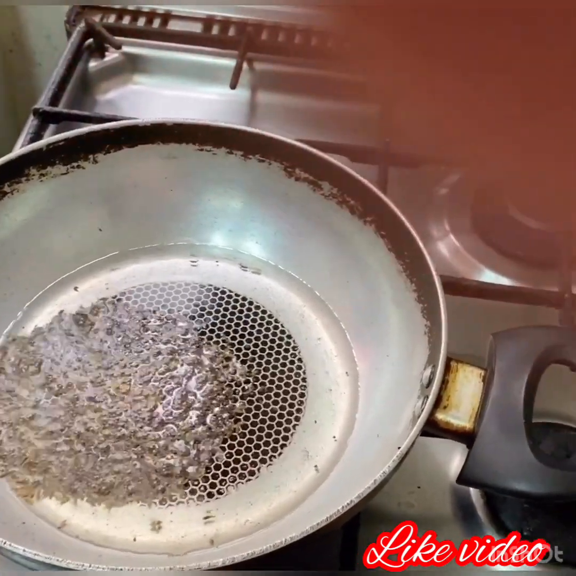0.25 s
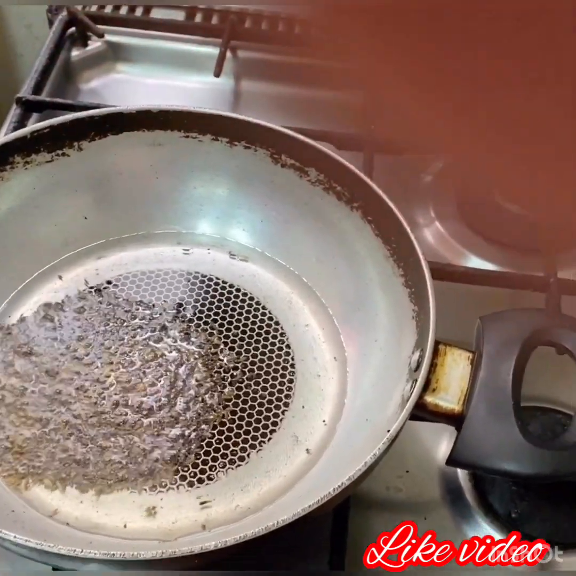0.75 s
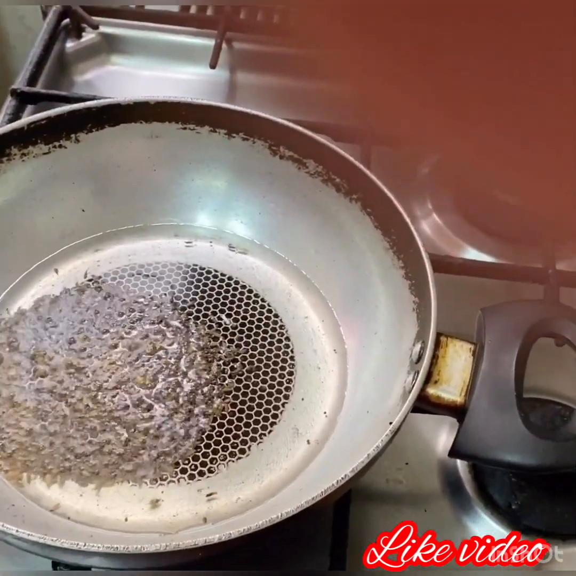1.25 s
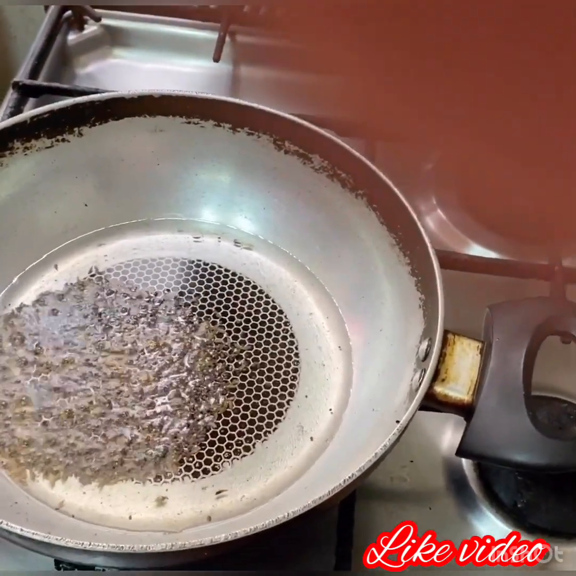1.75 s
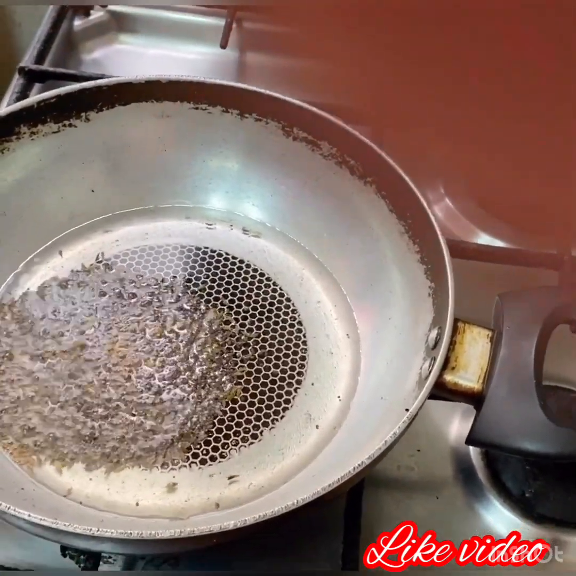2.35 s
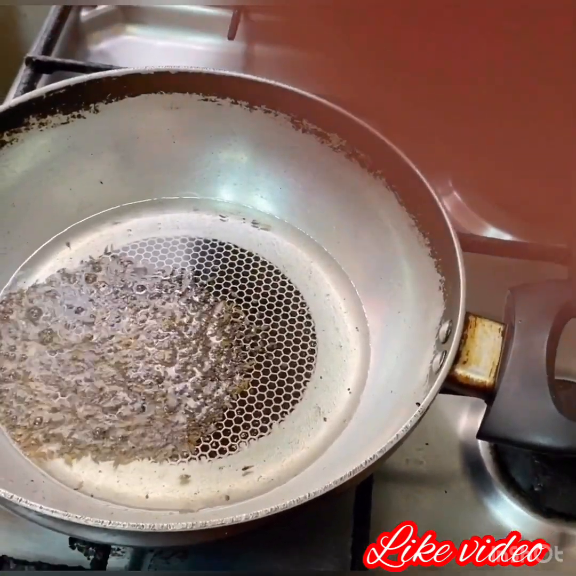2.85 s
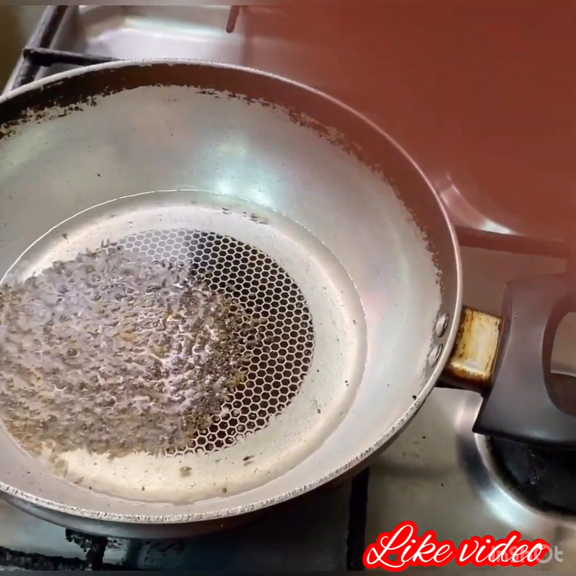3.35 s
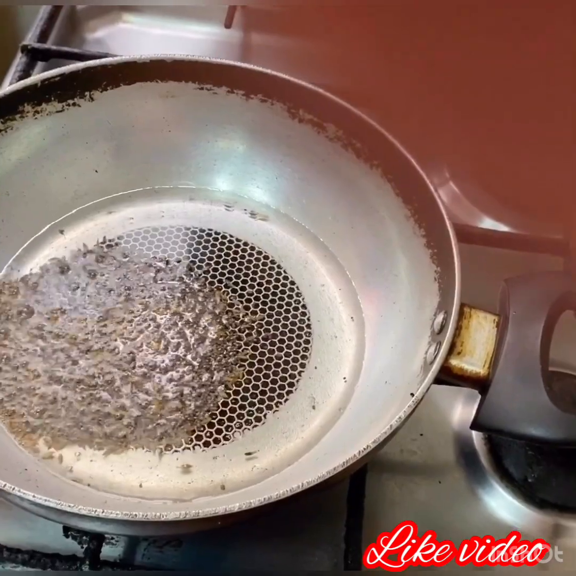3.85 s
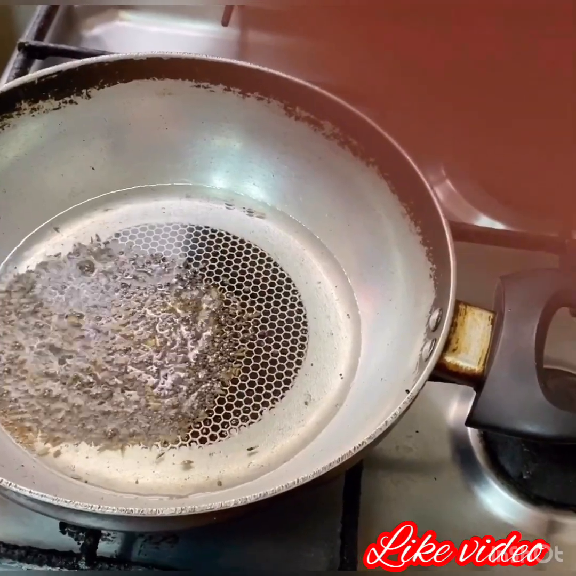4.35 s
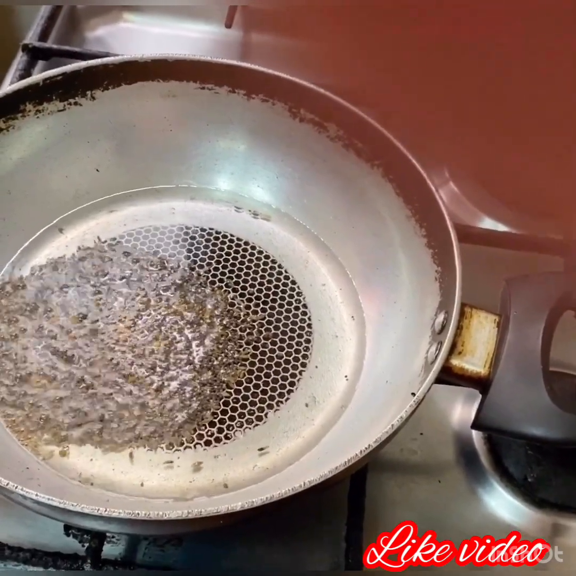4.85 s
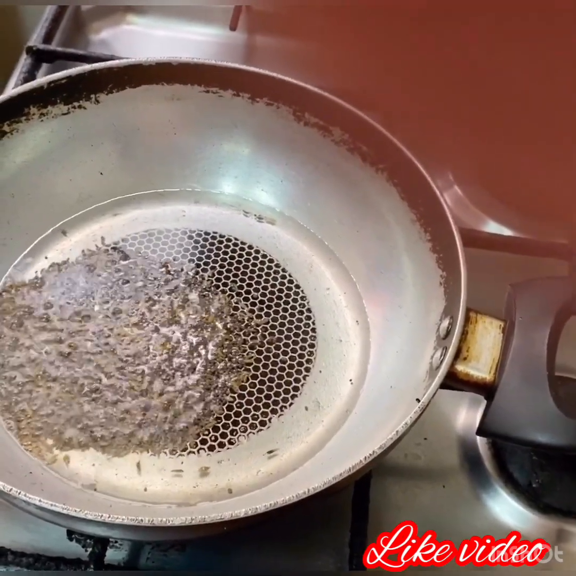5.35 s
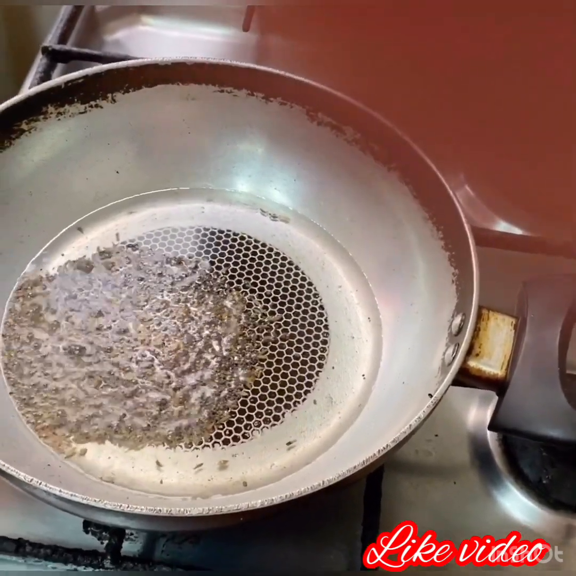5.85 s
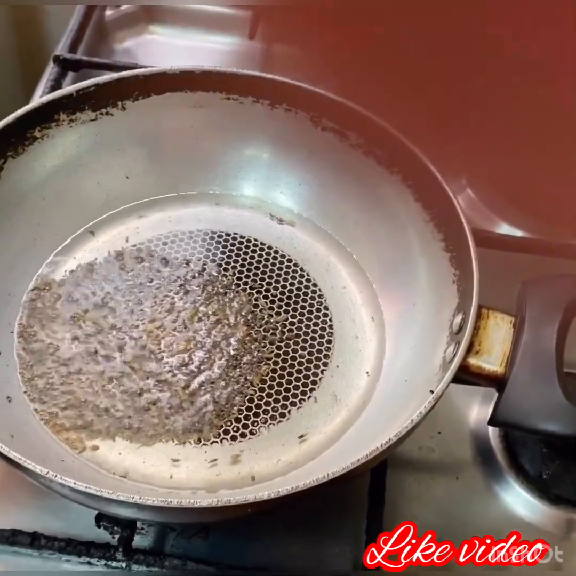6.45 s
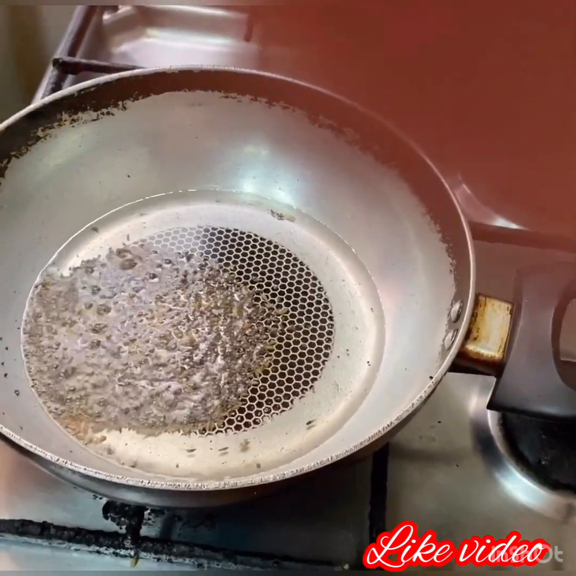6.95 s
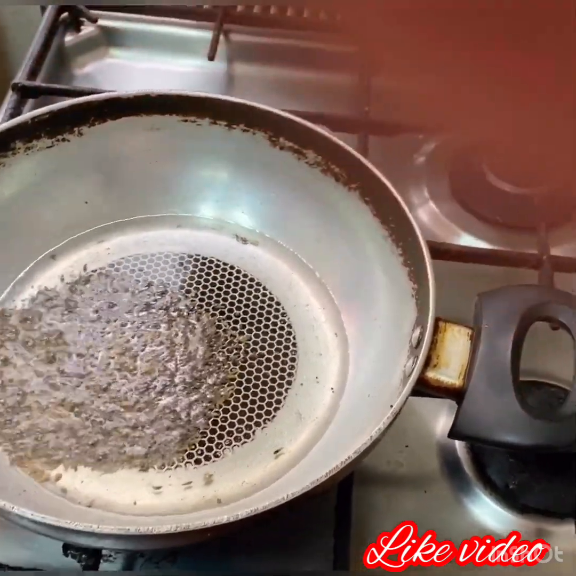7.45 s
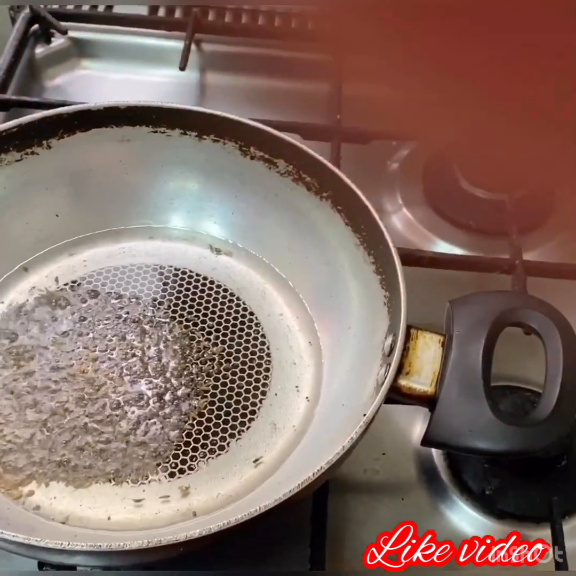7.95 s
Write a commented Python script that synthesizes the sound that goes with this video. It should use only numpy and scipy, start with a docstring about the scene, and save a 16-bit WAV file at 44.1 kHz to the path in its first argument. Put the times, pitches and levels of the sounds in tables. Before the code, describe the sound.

Mustard seeds crackle and snap in hot oil, pinging a steel pan over a roaring gas burner, the popping growing thicker in a small kitchen.

```python
"""Mustard seeds splutter in hot oil in a steel pan on a gas stove, close up in a small kitchen.
Throughout, the burner roars and a motor hums; seeds snap from the start, each kicking the pan, which
pings near 3 kHz. The fizz starts loud, drops within 0.2 s and is softest near 1.8 s, while steam hisses
from some husks; then it rises with lulls as the oil heats, and bursts thicken. Two short pops ring near
4.4 kHz at 5 and 7 s; from 6 s big bubbles plop; a soft low bump falls near 7.2 s. The room echoes the pan."""
import sys
import numpy as np
from scipy import signal
from scipy.fft import rfft, irfft, next_fast_len
from scipy.io import wavfile
from scipy.ndimage import map_coordinates

SR = 44100
rng = np.random.default_rng(int(sys.argv[2]) if len(sys.argv) > 2 else 0)


def int16_out(signal):
    """Quantize to a 16-bit WAV file."""
    q = np.round(np.clip(np.atleast_2d(signal).T, -1, 1) * 32767)
    wavfile.write(sys.argv[1], SR, q.astype(np.int16))


N = 362061
TOP_HZ = 16100
POP_SAMPLES = 1024
LEVEL_S = .005


def amp(db):
    """Decibels to gain."""
    return 10 ** (np.asarray(db) / 20)


def unit(x):
    """Scaled to rms 1."""
    return x / np.sqrt(np.mean(x ** 2) + 1e-20)


def burst(x):
    """Each row scaled to the energy of LEVEL_S at rms 1."""
    energy = np.sum(x ** 2, -1, keepdims=True)
    return x * np.sqrt(LEVEL_S * SR / (energy + 1e-20))


def along(points, hz):
    """(frequency [Hz], value) points read on a log frequency axis."""
    f, v = np.transpose(points)
    return np.interp(np.log(hz + 1), np.log(f), v)


def wobble(knots_per_s):
    """A smooth random curve through normal-distributed knots."""
    knots = rng.standard_normal(int(N * knots_per_s / SR) + 4)
    return map_coordinates(knots, [np.arange(N) * knots_per_s / SR])


def filtered(x, response):
    """x through a real or complex frequency response."""
    size = x.shape[-1]
    m = next_fast_len(size + size // 8)
    return irfft(rfft(x, m) * response(np.fft.rfftfreq(m, 1 / SR)), m)[..., :size]


def resonance(f, centre_hz, q):
    """Causal response of one resonance, gain 1 at its centre."""
    damping = 1j * f * centre_hz / q
    return damping / (centre_hz ** 2 - f ** 2 + damping)


def decay(t, t60):
    """Exponential decay, -60 dB after t60 seconds."""
    return amp(-60 * t / t60)


def placed(times_s, sounds):
    """One track with each row of sounds starting at its time."""
    index = np.round(np.abs(times_s) * SR).astype(int) + np.arange(sounds.shape[1])
    return np.bincount(index.ravel(), sounds.ravel(), N)[:N]


def from_pan(x, lag_s=0.0002, above_hz=7200):
    """Treble from the pan reaches the right port first; lower down both ports move together."""
    def late(f):
        return np.exp(-2j * np.pi * lag_s * np.maximum(f - above_hz, 0))
    return np.array([filtered(x, late), x])


# burner spectrum: (frequency [Hz], relative density [dB per Hz])
BURNER_SPECTRUM = [(12, -47), (20, -75), (45, -3), (97, -1.5), (130, -7), (210, -2.5), (240, -8),
                   (315, -0.5), (374, -8), (471, -6.5), (617, -14.5), (765, -7.5), (857, -13),
                   (1710, -20.5), (2000, -21.5), (2600, -25), (4400, -120)]
# burner left-right correlation: (frequency [Hz], correlation [1])
BURNER_CORRELATION = [(60, 0.96), (100, 0.95), (170, 0.62), (450, 0.67), (750, 0.016), (2000, 0.019)]
# motor hum partials: (frequency [Hz], level before hum_db and tilt [dB])
HUM_PARTIALS = [(102.8, -55), (154.3, -61.5), (208, -56), (310, -65), (470, -58.5), (512, -65.5),
                (678, -69.5), (1133, -67)]
ROAR_WAVER_DB, HUM_WAVER_DB = .8, 2.3


def stove(roar_db=-47.0, hum_db=-1, waver_rad=0.98):
    """Gas flame roar as shaped noise, partly alike left and right; motor hum as wavering sines."""
    t = np.arange(N) / SR

    def mid_side(f):
        turn = np.arccos(np.clip(along(BURNER_CORRELATION, f), -1, 1)) / 2
        return amp(along(BURNER_SPECTRUM, f)) * [np.cos(turn), np.sin(turn)]
    mid, side = filtered(rng.standard_normal((2, N)), mid_side)
    roar = amp(roar_db + ROAR_WAVER_DB * wobble(4.0)) * unit(np.array([mid + side, mid - side]))
    hum = np.zeros(N)
    for hz, db in HUM_PARTIALS:
        swell = amp(HUM_WAVER_DB * wobble(6))
        drift = waver_rad * np.sqrt(hz / 250) * wobble(12)
        hum += amp(db + hum_db) * unit(swell * np.sin(2 * np.pi * hz * t + drift))

    def tilt(f):  # left minus right: -1.4 dB in the bass, +1.9 dB above
        return amp(np.array([[.5], [-.5]]) * along([(90, -1.4), (250, 1.9)], f))
    return filtered(roar + hum, tilt)


def thud(s=7.19, db=-44, width_s=.06, hz=100):
    """One soft, low bump in the background: resonant noise under a Gaussian."""
    rumble = unit(filtered(rng.standard_normal(N), lambda f: resonance(f, hz, 2.8) ** 2))
    return amp(db) * rumble * np.exp(-((np.arange(N) / SR - s) / width_s) ** 2)


# frying level, base of fizz and small pops: (time [s], relative level [dB])
FRYING_LEVEL = [(0, -40.5), (.15, -58), (.75, -59.5), (1.8, -64.5), (3.2, -58.5), (3.75, -59.5), (4.3, -57),
                (5.5, -59.5), (6.5, -53.5), (6.78, -58.5), (7, -56.5), (8.2, -57)]


def frying(s):
    """Frying level in dB at times s: a loud start, a quiet stretch, then a rise with lulls."""
    return np.interp(s, *np.transpose(FRYING_LEVEL))


# fizz spectrum: (frequency [Hz], relative density [dB per Hz])
FIZZ_SPECTRUM = [(700, 8), (1500, -3), (2300, 12.5), (3000, 10), (4200, 9), (5400, 10.5), (7000, 9.5),
                 (11000, 11), (15500, 11)]
FIZZ_WAVER_DB, FIZZ_WAVER_KNOTS_PER_S = 1.8, 13


def oil(bubbles_per_s=900, size_db=4, grain_db=-2, fizz_db=6.5, wide_db=-7):
    """Countless tiny bubbles break on the oil as random clicks and merge with noise into a fizz."""
    level_db = frying(np.arange(N) / SR) + FIZZ_WAVER_DB * wobble(FIZZ_WAVER_KNOTS_PER_S)
    sizes = amp(size_db * np.minimum(rng.exponential(size=N), 4)) * rng.choice([-1, 1], N)
    bubbles = unit(sizes * (rng.random(N) < bubbles_per_s / SR))
    pair = from_pan(amp(grain_db) * bubbles + rng.standard_normal(N))
    pair = pair + amp(wide_db) * rng.standard_normal((2, N))
    fizz = unit(filtered(pair, lambda f: amp(along(FIZZ_SPECTRUM, f))))
    return amp(level_db + fizz_db) * fizz


# steam hisses from husks, and two short pops that ring near 4.4 kHz (5.045 s, 6.983 s):
# (start [s], length [s], starting pitch [Hz], level at mid-length [dB])
HISSES_AND_RINGING_POPS = [(-.05, 0.097, 12600, -40.5), (-.03, 0.43, 2664, -55.5), (0.166, 0.22, 6470, -59),
                           (0.481, 0.26, 5720, -55.5), (0.751, .06, 12800, -46.5), (0.872, .06, 12600, -51),
                           (0.72, 0.17, 5170, -57), (1.249, 0.25, 5400, -57), (2.23, 0.42, 5800, -57.5),
                           (3.472, 0.29, 5420, -60.5), (4.937, 0.15, 5520, -60), (5.045, 0.026, 4500, -41),
                           (6.983, 0.028, 4380, -44)]
SINK_OCTAVES_PER_S = .3


def hisses_and_ringing_pops(width_hz=600):
    """Narrow-band noise, sinking in pitch: steam losing pressure in split husks, and two short ringing pops."""
    t, out = np.arange(N) / SR, np.zeros(N)
    flutter = unit(filtered(rng.standard_normal((2, N)), lambda f: 1 / (1 + (f / width_hz) ** 2)))
    for start_s, length_s, hz, db in HISSES_AND_RINGING_POPS:
        u = np.clip((t - start_s) / length_s, 0, 1)
        sinking_hz = hz * 2 ** (-SINK_OCTAVES_PER_S * length_s * u)
        phase = 2 * np.pi * np.cumsum(sinking_hz) / SR
        band = flutter[0] * np.cos(phase) + flutter[1] * np.sin(phase)
        out += amp(db) * np.sqrt(4 * u * (1 - u)) * band
    return from_pan(out) * amp([[1], [-1]])  # dB, left and right


# bigger bubbles: (time [s], pitch [Hz], rms level over LEVEL_S [dB])
BIG_BUBBLES = [(6.1835, 1110, -39), (6.4216, 1560, -40.5), (6.9139, 1410, -38), (7.315, 1540, -41)]


def plops(t60=0.016, q=1.1):
    """A bigger bubble collapses: a short, hollow puff of resonant noise, alike on both sides."""
    s, hz, db = np.transpose(BIG_BUBBLES)[:, :, None]
    t = np.arange(POP_SAMPLES) / SR
    noise = decay(t, t60) * rng.standard_normal((len(s), len(t)))
    puff = filtered(noise, lambda f: resonance(f, hz, q) ** 2)
    return placed(s, amp(db) * burst(puff))


def pulse(t, index=7):
    """One single-sample pressure pulse just after the start of t."""
    return 1.0 * (np.arange(len(t)) == index)


SPOT_DB = 3  # scatter of mode strength from spot to spot on the pan
# bowl modes: (frequency [Hz], width [Hz], relative level [dB])
BOWL_MODES = [(2240, 680, -4), (2870, 540, 11), (3350, 700, -6)]
CLACK_DETUNE = .05  # log-frequency scatter


def clacks(s, db):
    """The pulse of a burst rings the bowl for a few cycles, in a colour that depends on the spot."""
    t = np.arange(POP_SAMPLES // 2) / SR
    load, spot = np.split(rng.standard_normal((len(s), 2 * len(BOWL_MODES))).T[:, :, None], 2)

    def bowl(f):
        total = 0
        for k, (hz, width_hz, gain_db) in enumerate(BOWL_MODES):
            mode = resonance(f, hz * np.exp(CLACK_DETUNE * load[k]), hz / width_hz)
            total = total + amp(gain_db + SPOT_DB * spot[k]) * mode
        return total
    return placed(s, amp(db) * burst(filtered(pulse(t), bowl)))


def knocks(s, db, centre_hz=1350, t60=0.026, q=1.35):
    """The puff of steam from a burst gives it a short, low body, much the same on both sides."""
    t = np.arange(POP_SAMPLES // 2) / SR
    mid, side = decay(t, t60) * rng.standard_normal((2, len(s), len(t)))
    ports = np.array([mid + side / 2, mid - side / 2])
    puff = burst(filtered(ports, lambda f: resonance(f, centre_hz, q) ** 2))
    return np.array([placed(s, amp(db) * port) for port in puff])


# pan floor under a seed: (frequency [Hz], relative level [dB])
PAN_FLOOR_MODES = [(2070, -21), (3000, 3), (3450, -7)]
# pan resonances: (frequency [Hz], width [Hz], relative level [dB])
PAN_MODES = [(2060, 54, -6.5), (2870, 115, -6.5), (3040, 140, -9), (3430, 62, -2.5), (3960, 96, -7.5)]
RING_DB, RATTLE_T60_S, PAN_DETUNE = -10, .004, .018
PING_VARIES_OCTAVES, CONTACT_OCTAVES_PER_DB = .3, .05  # of ping length


def pings(s, db, contact_db, rise_s=0.0004, left_db=-0.5, right_db=-10.5, scatter=.038, t60=.009):
    """The pan floor radiates a few beating cycles near 3 kHz, mostly left; its resonances ring on briefly."""
    t = np.arange(POP_SAMPLES) / SR
    z = rng.standard_normal((len(s), 3 + 2 * len(PAN_MODES)))
    # loose contact gives a dry tick, firm contact swells and sings a little longer
    octaves = CONTACT_OCTAVES_PER_DB * contact_db - .5 + PING_VARIES_OCTAVES * z[:, 2:3]
    life = 2 ** np.clip(octaves, -1, .5)
    shape = (1 - np.exp(-t / (rise_s * life ** 2))) * decay(t, t60 * life)
    detune = np.exp(scatter * z[:, :1])
    swing = 0
    for hz, gain_db in PAN_FLOOR_MODES:
        gain = amp(gain_db + SPOT_DB * rng.standard_normal((len(s), 1)))
        swing = swing + gain * np.exp(2j * np.pi * hz * detune * t)
    # moving oil detunes the resonances; each spot excites them at other strengths
    load, spot = np.split(z[:, 3:].T[:, :, None], 2)

    def steel(f):
        total = 0
        for k, (hz, width_hz, gain_db) in enumerate(PAN_MODES):
            mode = resonance(f, hz * np.exp(PAN_DETUNE * load[k]), hz / width_hz)
            total = total + (-1) ** k * amp(gain_db + SPOT_DB * spot[k]) * mode
        return total
    rattle = decay(t, RATTLE_T60_S) * rng.standard_normal((2, len(s), len(t)))
    rings = amp(RING_DB) * burst(filtered(rattle, steel))
    turned = swing * np.exp(1j * z[:, 1:2])
    left = amp(left_db) * burst(shape * swing.imag) + rings[0]
    right = amp(right_db) * burst(shape * turned.imag) + rings[1] / 2
    return np.array([placed(s, amp(db) * port) for port in (left, right)])


# bowl's colouring of each snap: (frequency [Hz], gain [dB])
BOWL_COLOUR = [(1800, -9), (4000, 0.5), (4800, 0.5), (5800, -3), (7700, 2), (12000, 0)]
PULSE_DB, CRACK_T60_S, SPRAY_T60_S, SNAP_Q = -3.5, .0023, .018, .6


def snaps(s, db, hz, spray_db=-19, dull_hz=15000):
    """The husk splits with a pressure pulse and a short tearing crack, then flings a brief spray of oil."""
    t = np.arange(POP_SAMPLES // 2) / SR
    crack = (1 - np.exp(-t / 0.0001)) * decay(t, CRACK_T60_S)
    spray = amp(spray_db) * decay(t, SPRAY_T60_S)

    def colour(f):
        pitch = resonance(f, hz, SNAP_Q) * resonance(f, hz, 1.0)
        dulling = (f < TOP_HZ) / (1 + (f / dull_hz) ** 4) ** .5
        return pitch * amp(along(BOWL_COLOUR, f)) * dulling
    tearing = burst((crack + spray) * rng.standard_normal((len(s), len(t))))
    split = amp(PULSE_DB) * burst(pulse(t)) + tearing
    return from_pan(placed(s, amp(db) * burst(filtered(split, colour))))


def small_pops(count=400, snap_db=3, ping_db=4, spread_db=1.5, contact_db=5.0,
               pitch_hz=6000, contact_octaves=0.92):
    """Faint bursts, denser with time, level following the frying curve: rows like LOUD_POPS.
    The firmer a seed lies on the pan floor, the more it pings and the softer and duller it snaps."""
    size, contact = np.clip(rng.standard_normal((count, 2)), -2, 2).T
    s = N / SR * rng.random(count) ** .7
    db = frying(s) + spread_db * size
    hz = np.clip(pitch_hz * 2 ** (-contact_octaves * contact), 3500, 13000)
    snap = db + snap_db - contact_db * contact
    ping = db + ping_db + contact_db * contact
    return np.column_stack([s, snap, hz, ping])


# louder bursting seeds, rms levels over LEVEL_S, pings before the port gains:
# (time [s], first-step snap level [dB], snap pitch [Hz], ping level [dB])
LOUD_POPS = [(0.0262, -30, 7850, -52), (0.0628, -36, 5060, -40), (0.0983, -29, 6800, -20),
             (0.1616, -42, 6600, -27), (0.2321, -40, 7200, -43), (0.2774, -37.5, 6040, -30.5),
             (0.49, -33.5, 6300, -40), (0.514, -30.5, 13200, -43), (0.5687, -39, 9200, -27.5),
             (0.6002, -22.5, 9450, -30), (0.6384, -31, 6700, -38), (0.8079, -43, 5800, -40),
             (0.8615, -44.5, 3800, -35), (0.9324, -40, 3920, -33.5), (0.9552, -36, 9350, -58),
             (1.0017, -38, 4100, -42), (1.0164, -30.5, 5700, -30.5), (1.1347, -34, 8800, -65),
             (1.208, -28.5, 6050, -30), (1.2487, -28.5, 4340, -39), (1.2675, -41, 3800, -39),
             (1.6264, -43, 3570, -19.5), (1.633, -32, 6940, -29), (1.6592, -36, 5300, -46),
             (1.6693, -32.5, 7650, -35.5), (1.7239, -37.5, 6300, -33), (1.8529, -48, 5600, -35.5),
             (1.9041, -38.5, 6600, -28.5), (1.9285, -44, 4780, -45), (2.0929, -53, 4800, -40.5),
             (2.1912, -25.5, 10800, -30), (2.2959, -31, 11200, -47), (2.4161, -43.5, 5700, -47),
             (2.467, -37.5, 5100, -43), (2.5029, -31, 13700, -45), (2.5344, -33, 5900, -60),
             (2.6067, -37.5, 6300, -24), (2.6871, -35, 10500, -51), (2.7052, -37, 13600, -39),
             (2.7168, -37, 3900, -61), (2.7924, -26, 9700, -34), (2.8877, -42, 3800, -36),
             (2.8973, -33.5, 4770, -23), (2.9385, -40, 3820, -30.5), (2.9763, -35.5, 4070, -40),
             (3.0088, -56, 3800, -22.5), (3.0233, -32.5, 5060, -26), (3.0419, -27.5, 9100, -27.5),
             (3.0566, -33, 5800, -31.5), (3.1072, -24.5, 12900, -41), (3.1211, -54, 7300, -32),
             (3.2739, -40, 7300, -44), (3.2891, -21.5, 12200, -33.5), (3.3139, -28.5, 4380, -20),
             (3.4275, -43.5, 5900, -39), (3.4612, -26, 9750, -58), (3.5507, -35.5, 10900, -42.5),
             (3.6487, -34, 4240, -23.5), (3.713, -37, 5030, -27), (3.7261, -51, 6000, -42),
             (3.8697, -34, 11900, -57), (3.8797, -41, 4600, -28.5), (3.8866, -41, 7500, -40),
             (3.9008, -27.5, 9300, -59), (3.9178, -29.5, 9000, -33.5), (3.9934, -33, 9400, -41),
             (4.0142, -31, 8200, -51), (4.0272, -39, 6800, -36), (4.1124, -33, 7100, -37),
             (4.1204, -34.5, 10000, -36), (4.132, -34, 8840, -39), (4.1617, -32.5, 5400, -31),
             (4.2499, -36, 4020, -32.5), (4.2924, -37, 6900, -46), (4.3096, -50, 7500, -45),
             (4.3329, -40, 6860, -31.5), (4.364, -31, 11200, -42), (4.3916, -52, 9300, -35),
             (4.4074, -30, 5600, -26.5), (4.4422, -24.5, 10400, -39), (4.556, -39.5, 7300, -24.5),
             (4.5987, -26.5, 11100, -31), (4.6106, -51, 6800, -24), (4.6486, -24, 11600, -55),
             (4.7115, -46, 5200, -36), (4.726, -41, 7200, -29.5), (4.73, -43, 5300, -26),
             (4.7727, -40, 6200, -32), (4.7787, -49, 3800, -32), (4.8047, -44, 5900, -43),
             (4.8134, -35, 9500, -47.0), (4.8362, -43.5, 5500, -25), (4.9396, -51, 7600, -35),
             (4.9699, -45.5, 8300, -30), (5.0462, -37, 4340, -31), (5.0581, -31.5, 3960, -39),
             (5.1006, -42, 5500, -32), (5.1159, -38, 7200, -29.5), (5.1373, -35.5, 10100, -51),
             (5.1484, -46, 6600, -38), (5.2338, -26, 8300, -39.5), (5.2726, -42, 6200, -36),
             (5.3038, -45, 10000, -47), (5.3078, -41, 6840, -33), (5.415, -32, 6560, -23.5),
             (5.4197, -45, 6100, -40), (5.4976, -27, 9900, -33), (5.5088, -39, 6100, -39),
             (5.5841, -36.5, 8650, -42), (5.6186, -54, 5700, -34), (5.6486, -40, 5200, -38),
             (5.6541, -34.5, 5500, -46), (5.7173, -29.5, 9900, -41), (5.7469, -24, 11900, -45),
             (5.7765, -36, 5000, -30.5), (5.7803, -34.5, 4770, -29), (5.8248, -39.5, 5950, -28.5),
             (5.9398, -31.5, 8350, -29.5), (5.9875, -29.5, 7750, -31), (6.0535, -46, 4400, -28.5),
             (6.0749, -23.5, 10700, -31), (6.1661, -34, 8500, -36), (6.1837, -23.5, 6230, -23),
             (6.2853, -42, 5900, -25.5), (6.3303, -23, 12800, -35), (6.3326, -33, 8200, -23),
             (6.3657, -24.5, 10500, -27.5), (6.4216, -22, 8500, -29), (6.4237, -23, 9500, -29),
             (6.4729, -42, 5500, -35), (6.5483, -30, 5840, -23), (6.5928, -29.5, 8060, -34),
             (6.6068, -35, 9400, -34.5), (6.6178, -38, 4600, -37), (6.6756, -43, 7000, -39),
             (6.6926, -41, 6150, -33.5), (6.8036, -55, 8400, -36), (6.8632, -56, 7400, -30.5),
             (6.8736, -34.5, 7340, -37), (6.8984, -36, 9400, -48), (6.9139, -30, 9400, -35),
             (6.9272, -22.5, 12500, -33.5), (6.9647, -44, 5000, -33), (6.9725, -41, 9700, -34),
             (6.9782, -34, 9150, -43), (6.9973, -31, 4140, -35), (7.0494, -24.5, 12900, -31),
             (7.1316, -30, 12300, -39), (7.139, -40, 4600, -31), (7.1631, -42, 7700, -21),
             (7.208, -37, 7100, -25), (7.2667, -44, 6500, -38), (7.2909, -35, 6400, -24.5),
             (7.3132, -23.5, 13400, -32), (7.3329, -43, 9100, -27.5), (7.3559, -34, 3800, -37),
             (7.3694, -41, 5200, -32), (7.3846, -31.5, 3800, -34), (7.4645, -47, 6000, -34.5),
             (7.5764, -33, 6300, -41), (7.5968, -33, 9000, -37), (7.635, -32, 4400, -27),
             (7.6663, -51, 5400, -37), (7.696, -32.5, 7100, -41), (7.7076, -59, 5600, -32),
             (7.7217, -33.5, 7100, -31), (7.7697, -44, 4500, -42), (7.8022, -36.5, 10300, -60),
             (7.8085, -42, 7600, -23.5), (7.8226, -47, 6300, -38), (7.8405, -40, 5500, -28),
             (7.8604, -32, 6600, -30), (7.869, -32.5, 8800, -57), (7.9069, -40, 5700, -26.5),
             (7.9311, -35, 4700, -52), (7.9498, -36.5, 6740, -30), (7.9845, -35, 9900, -50),
             (7.999, -40, 5800, -30), (8.0149, -37, 3800, -31.5), (8.0247, -27, 6030, -29.5),
             (8.0388, -43, 4900, -17), (8.1084, -33, 7550, -24.5), (8.136, -32.5, 9100, -32),
             (8.1695, -41, 6800, -22.5), (8.1834, -35, 3820, -43), (8.1998, -31, 6330, -20)]
KNOCK_UNDER_SNAP_DB, KNOCK_UNDER_PING_DB, KNOCK_SCATTER_DB = -18, -21, -0.5
KNOCK_GROWTH = 1.132  # dB of knock per dB of burst: big seeds throw more steam
CLACK_DB = -4  # relative to the knock before growth and scatter
SPLIT_GAP_S, SPLIT_DB, SPLIT_SCATTER_DB = .0014, -11, 2  # second step of the snap; median gap


def seeds():
    """Every burst is a snap in two steps, a ping of the pan, and a low knock and a clack that grow with both."""
    s, snap_db, snap_hz, ping_db = np.vstack([LOUD_POPS, small_pops()]).T[:, :, None]
    gap, second, puff = np.clip(rng.standard_normal((len(s), 3)), -2, 2).T[:, :, None]
    first_step = snaps(s, snap_db, snap_hz)
    second_s = s + SPLIT_GAP_S * 2 ** (gap / 2)
    second_step = snaps(second_s, snap_db + SPLIT_DB + SPLIT_SCATTER_DB * second, snap_hz)
    strength = amp(snap_db + KNOCK_UNDER_SNAP_DB) + amp(ping_db + KNOCK_UNDER_PING_DB)
    strength_db = 20 * np.log10(strength)
    knock_db = KNOCK_GROWTH * strength_db + KNOCK_SCATTER_DB * puff
    ping = pings(s, ping_db, ping_db - snap_db)
    return first_step + second_step + ping + knocks(s, knock_db) + clacks(s, strength_db + CLACK_DB)


# diffuse tail: (frequency [Hz], t60 [s])
TAIL_T60 = [(300, 0.41), (2600, 0.23), (7000, 0.2), (15000, 0.16)]
# colour of the whole room answer: (frequency [Hz], reflected level [dB])
WALL_COLOUR = [(1500, 3), (3000, 2), (5500, 5.5), (8000, -6.5), (15000, -7.5)]
ECHOES_S, ECHO_SCATTER = (.006, .0135, .031), .08
TAIL_DB, TAIL_BUILD_S = -7, .006


def room_answer(walls_db=-14):
    """Hob, tiles and wall give separate, ever weaker echoes; a short diffuse tail builds up behind them."""
    hz, t, z = signal.stft(rng.standard_normal((2, SR // 3)), SR, nperseg=256)
    envelope = (1 - np.exp(-t / TAIL_BUILD_S)) * decay(t, along(TAIL_T60, hz)[:, None])
    tail = signal.istft(z * envelope, SR, nperseg=256)[1]
    answer = amp(TAIL_DB) * tail / np.linalg.norm(tail[0])
    for side in answer:
        delay_s = np.array(ECHOES_S) * np.exp(ECHO_SCATTER * rng.standard_normal(len(ECHOES_S)))
        side[(delay_s * SR).astype(int)] += amp(walls_db) * np.sqrt(delay_s[0] / delay_s)
    return filtered(answer, lambda f: amp(along(WALL_COLOUR, f)))


def kitchen(x, count=32):
    """Reflections by convolution; each of count stretches of time gets its own echo patterns."""
    out = np.zeros((2, N + SR))
    for span in np.array_split(np.arange(N), count):
        # both sides feed the room alike
        straight = signal.fftconvolve(x[:, span], room_answer(), axes=1)
        crossed = signal.fftconvolve(x[::-1, span], room_answer(), axes=1)
        wet = straight + crossed
        out[:, span[0]:span[0] + wet.shape[1]] += wet / np.sqrt(2)
    return out[:, :N]


def scene():
    """The pan and its echo over oil fizz, stove noise and the bump."""
    pan = seeds() + plops() + hisses_and_ringing_pops()
    return pan + kitchen(pan) + oil() + stove() + thud()


def record(dry):
    """Steep low-pass: next to nothing passes above TOP_HZ."""
    return filtered(dry, lambda f: 1 / np.sqrt(1 + (f / TOP_HZ) ** 160))


dry = scene()
out = record(dry)
int16_out(out)
```